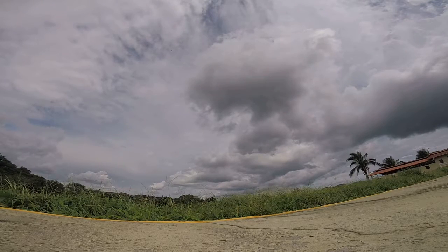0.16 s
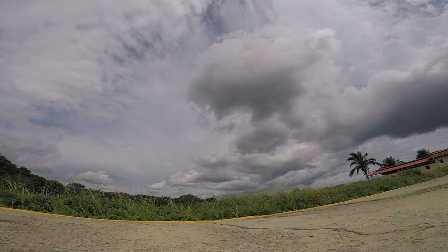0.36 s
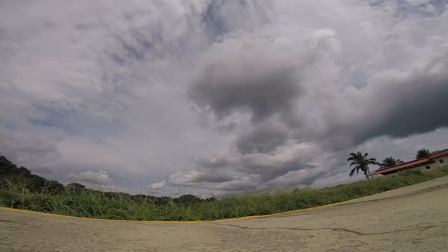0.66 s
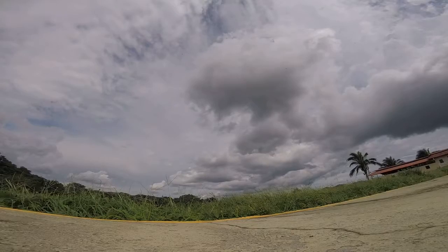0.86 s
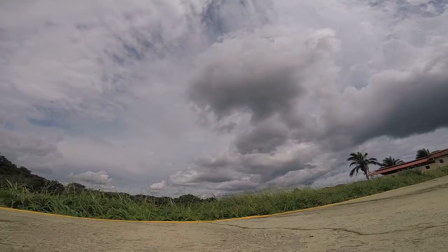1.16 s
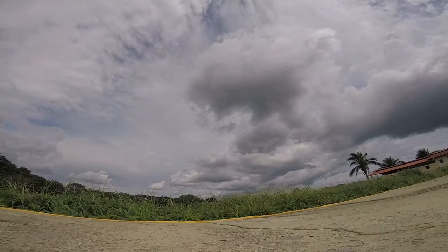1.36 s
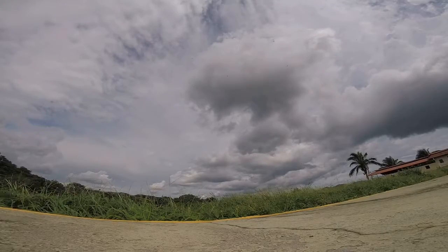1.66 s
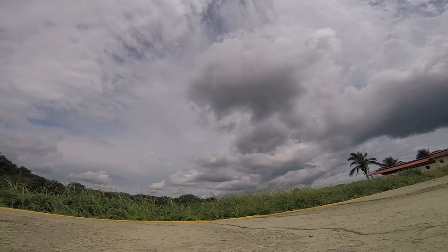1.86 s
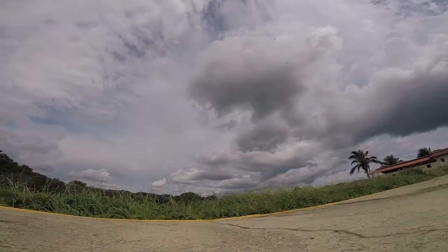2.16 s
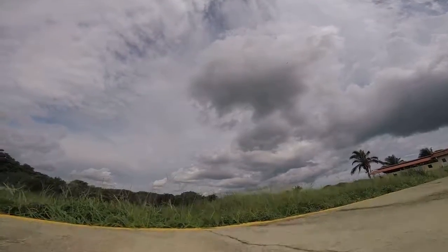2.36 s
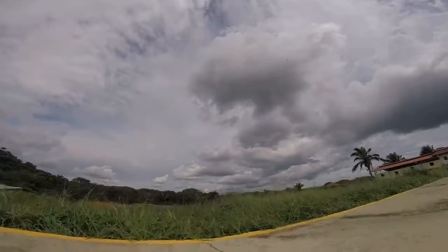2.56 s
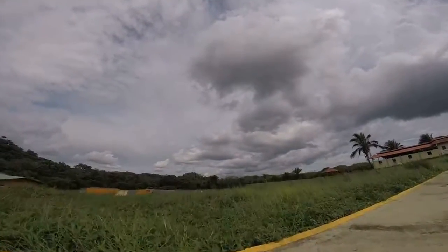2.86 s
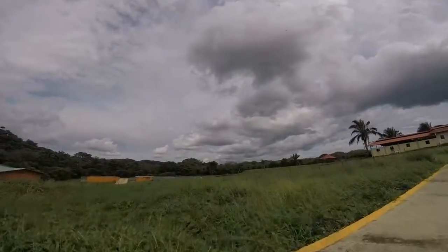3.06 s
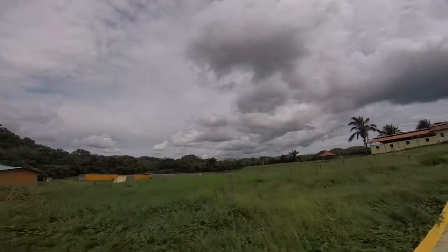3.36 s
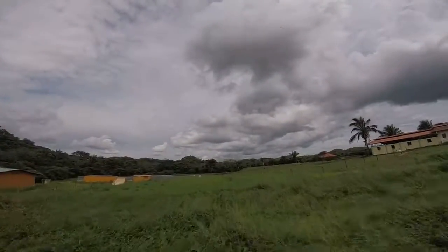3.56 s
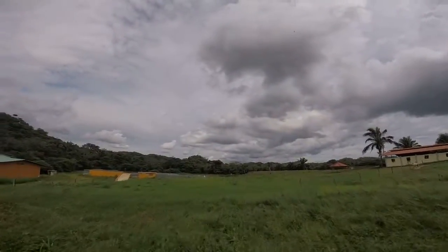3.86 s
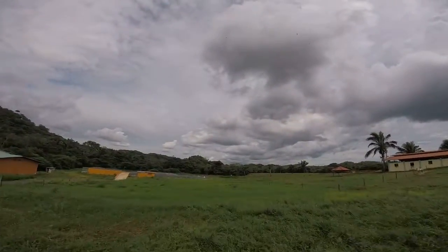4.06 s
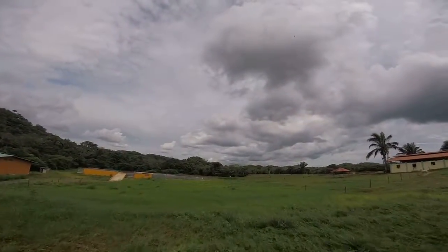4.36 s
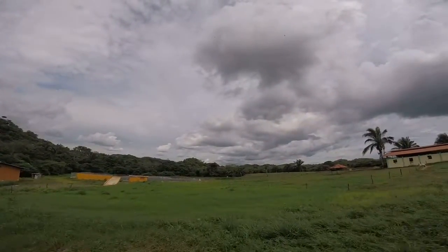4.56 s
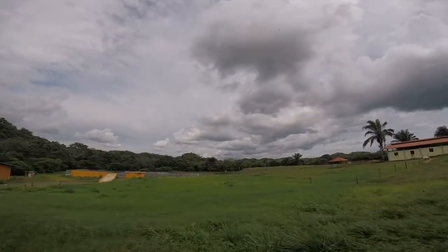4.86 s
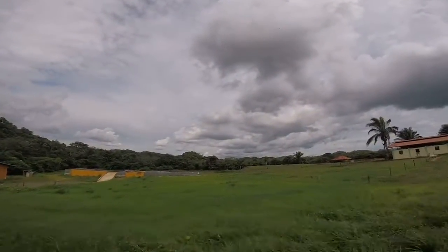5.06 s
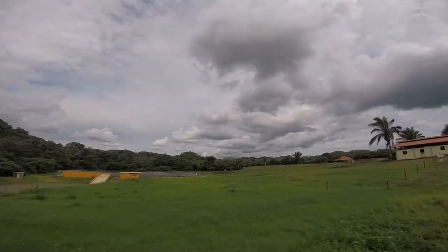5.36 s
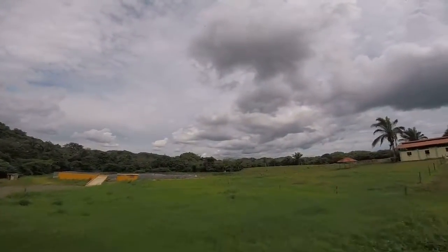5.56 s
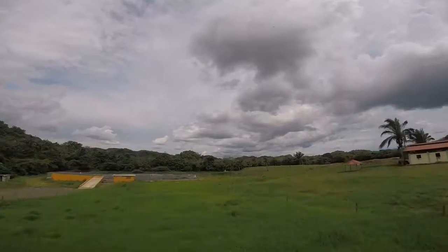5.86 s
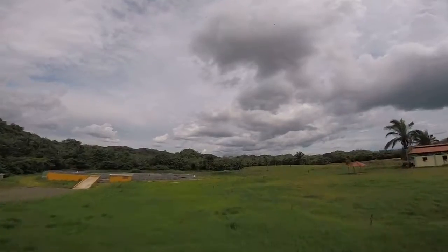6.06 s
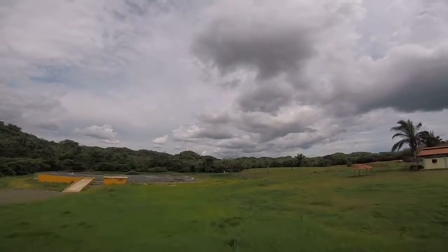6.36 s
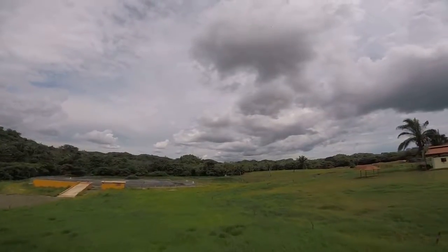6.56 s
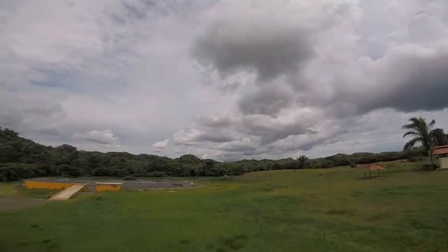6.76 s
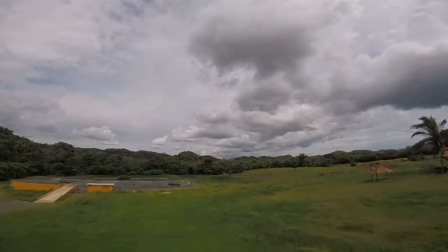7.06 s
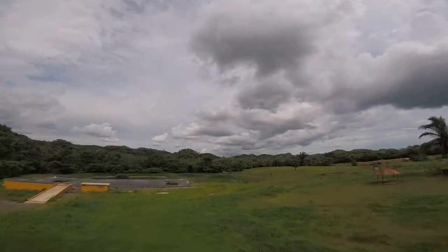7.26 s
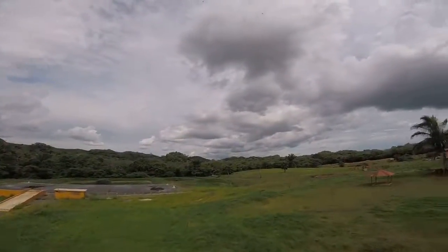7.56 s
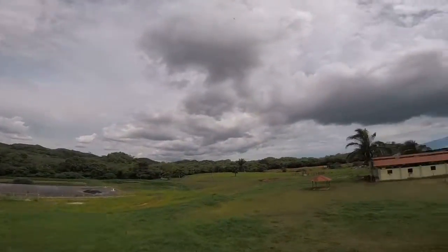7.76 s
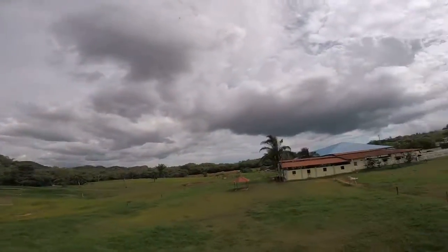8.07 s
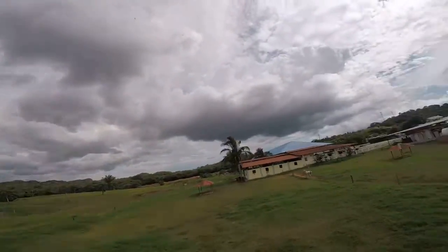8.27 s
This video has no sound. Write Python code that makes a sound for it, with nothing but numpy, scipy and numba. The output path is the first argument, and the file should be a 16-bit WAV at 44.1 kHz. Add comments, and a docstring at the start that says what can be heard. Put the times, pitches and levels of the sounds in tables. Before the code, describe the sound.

Heard from a microphone on the craft itself, a small quadcopter spins up, chatters briefly against concrete and takes off. Its propellers buzz at unequal, wavering pitches that rise steadily, mixed with a thin motor whine, air hiss and low wind rumble. Flying low over grass, it gives four bursts of throttle, the last two highest and each followed by a drop to idle, then revs up unevenly at the end.

```python
"""Racing quadcopter taking off

Heard from its own camera, a small quadcopter idles on concrete, lifts off and flies low over grass
with bursts of throttle. Four three-bladed propellers run at unequal speeds: blades buzz, unbalanced
shafts shake the frame and beat, magnets whine. The blades chop their own wash into hiss, air buffets
the microphone, and the camera's limiter holds the peaks."""
import sys
import numpy as np
from scipy import signal
from scipy.fft import rfft, irfft, next_fast_len
from scipy.io import wavfile
from scipy.ndimage import uniform_filter1d, minimum_filter1d
from numba import njit

SR = 44100
rng = np.random.default_rng(int(sys.argv[2]) if len(sys.argv) > 2 else 0)


def write(x):
    x = np.atleast_2d(x).T
    wavfile.write(sys.argv[1], SR, np.round(np.clip(x, -1, 1) * 32767).astype(np.int16))


N = 371322
TIME = np.arange(N) / SR
# the feet leave the concrete, then the craft climbs clear of its reflected wash (start [s], fade [s])
UNSTICKS, CLIMBS_CLEAR = (0.27, 0.42), (2.39, 0.22)

# transmission through the camera housing (frequency [Hz], gain [dB])
HOUSING = [(250, 8.5), (400, -1), (580, -4), (740, -6.5), (1100, 2.5), (1300, -0.5), (1900, -5),
           (3200, -5.5), (5000, -9), (7400, 3.5), (9000, 1.5), (10000, -27), (13000, -32), (15000, -54.5)]
# spectrum of grit and of the tick (frequency [Hz], level [dB])
GRIT_SPECTRUM = [(500, -31), (3000, -10.5), (6000, 2), (9500, -10), (13000, -14.5), (15000, -35.5)]


def undb(db):
    """Amplitude ratio of a level in decibels."""
    return 10 ** (np.asarray(db) / 20)


def curves(table):
    """Linear interpolation of each column over time."""
    times, *columns = np.transpose(table)
    return [np.interp(TIME, times, column) for column in columns]


def fade(start_s, fade_s):
    """Linear ramp from one to zero."""
    return np.clip(1 - (TIME - start_s) / fade_s, 0, 1)


def walk(rate):
    """Smooth random fluctuation of unit spread, changing about rate times a second."""
    size = max(int(SR / rate), 1)
    held = np.repeat(rng.standard_normal(N // size + 1), size)
    return 1.276 * uniform_filter1d(uniform_filter1d(held, size), size)[:N]


def response(hz, points):
    """Frequency response in dB, interpolated on a logarithmic frequency axis."""
    points_hz, db = np.transpose(points)
    return np.interp(np.log(hz), np.log(points_hz), db)


def shape(x, points):
    """Linear filtering: the spectrum is multiplied by a frequency response."""
    size = next_fast_len(N)
    bin_hz = np.maximum(np.arange(size // 2 + 1) * SR / size, 1)
    return irfft(rfft(x, size) * undb(response(bin_hz, points)), size)[:N]


def colour(x, spectrum):
    """Spectral shaping, normalised to unit RMS."""
    shaped = shape(x, spectrum)
    return shaped / np.std(shaped)


def noise(spectrum):
    """Coloured Gaussian noise of unit RMS."""
    return colour(rng.standard_normal(N), spectrum)


def speed_law(blade_hz, full_db, octave_db, knee_hz):
    """Power law of air noise: it climbs by octave_db an octave and levels off at full_db past the knee."""
    return full_db - octave_db * np.log2(np.hypot(1, knee_hz / blade_hz))


def tick(decay_s):
    """Exponential decay: a short burst of noise is heard as one dry tick."""
    # onset (time [s], level [dB])
    onsets = [(7.473, -36)]
    envelope = sum(undb(db) * np.exp(-np.abs(TIME - s) / decay_s) * (TIME >= s) for s, db in onsets)
    return envelope * colour(rng.uniform(-1, 1, N), GRIT_SPECTRUM) / 2


def ground_contact():
    """Impact and friction: the frame chatters on the concrete and scrapes over grit as it lifts."""
    # contact noise (time [s], chatter level [dB], grit level [dB])
    levels = [(0, -16, -89), (.31, -12, -68), (.35, -16, -31.5), (.41, -9.5, -36), (.49, -15.5, -38),
              (.55, -14, -51), (.9, -58, -61), (1.2, -95, -89)]
    # rattling frame (frequency [Hz], level [dB])
    chatter_spectrum = [(60, -38), (200, -4.5), (270, 3), (350, -4.5), (480, -12), (590, -5.5),
                        (700, -23.5), (900, -26), (1050, -26), (3000, -46), (12000, -63)]
    chatter_db, grit_db = curves(levels)
    chatter = undb(chatter_db) * noise(chatter_spectrum)
    grit = undb(grit_db + 0.87 * walk(rate=220)) * noise(GRIT_SPECTRUM)
    return chatter + grit


def buffeting(blade_hz, turbulence_db, slew):
    """Turbulent pressure: gusts thump the microphone; rough air and throttle jolts make the frame rumble."""
    # wind on the microphone (frequency [Hz], level [dB])
    gust_spectrum = [(15, 11), (30, -7), (60, 5), (110, 3), (160, -3.5), (300, -26.5), (800, -62),
                     (5000, -110)]
    # rumbling frame (frequency [Hz], level [dB])
    rumble_spectrum = [(50, -18.5), (120, 8.5), (250, 0), (370, -1.5), (480, -11.5), (720, -6.5),
                       (900, -17), (1500, -25.5), (3000, -41.5), (12000, -83.5)]
    headwind_db = 1.6 * np.maximum(TIME - CLIMBS_CLEAR[0], 0)  # the craft gathers speed in the open
    reflected_wash_db = 8.5 * fade(*CLIMBS_CLEAR)
    gust_db = speed_law(blade_hz, full_db=-27, octave_db=11, knee_hz=399.5) + 1.01 * turbulence_db
    gust_db += headwind_db + reflected_wash_db + 2 * walk(rate=13)
    rumble_db = speed_law(blade_hz, full_db=-30, octave_db=1.2, knee_hz=295) + 0.62 * turbulence_db
    rumble_db += 1.36 * slew
    return undb(gust_db) * noise(gust_spectrum) + undb(rumble_db) * noise(rumble_spectrum)


def magnets(angle, shaft_hz):
    """Cogging: fourteen magnets tug at the stator slots, sounding multiples of the shaft rate."""
    # magnet and slot tones (multiple of shaft rate, idle level [dB], flight level [dB])
    orders = [(14, -49, -47), (42, -62, -52.5), (89, -83, -49)]
    idle_hz, flight_hz = 57, 113
    load = np.clip((shaft_hz - idle_hz) / (flight_hz - idle_hz), 0, 1)
    turn = (angle % (2 * np.pi)).astype(np.float32)
    return sum(undb(idle + load * (flight - idle)) * np.sin(round(k) * turn) * (k * shaft_hz < SR / 2)
               for k, idle, flight in orders)


def motor_whine(angles, shaft_rates, touch):
    """Structure-borne sound: magnet tones cross the housing; bearings keep the motor bells ringing."""
    # resonances of the motor bells (frequency [Hz], level [dB])
    bell_spectrum = [(1000, -23.5), (1850, -3.5), (2060, 15), (2300, -12.5), (4200, -9), (4550, -1),
                     (4900, -14), (5600, 1.5), (6100, -10), (6750, -7), (7400, -28.5), (8900, -3.5),
                     (9600, -9), (15000, -48.5)]
    lead, *others = [magnets(angle, hz) for angle, hz in zip(angles, shaft_rates)]
    sounding_board = undb(28 * touch ** 2)  # the concrete sounds along while the feet touch
    tones = sounding_board * shape(lead + undb(-2.5) * sum(others), HOUSING)
    bearings = undb(-58.5 + 4.7 * walk(rate=13)) * noise(bell_spectrum)
    return tones + bearings


def imbalance(angle, db, octave_db):
    """Forced vibration: an off-centre mass pulls once a turn; the flexing frame passes it on unevenly."""
    amplitude = np.sqrt(2) * undb(db + 3.0 * walk(rate=25))
    return amplitude * (np.sin(angle) + undb(octave_db) * np.sin(2 * angle))


def frame_shake(angles, shaft_rates):
    """Beating: the unbalanced second and fourth motors drive the frame at unequal rates."""
    # response of the frame (shaft rate [Hz], level [dB])
    frame_response = [(50, -35.5), (100, -22), (120, -14), (145, -20), (170, -9.5), (188, -10.5),
                      (215, -14), (272, -3), (330, -12)]
    shake_db = response(shaft_rates[1], frame_response)
    second = imbalance(angles[1], shake_db - .7, octave_db=-23.5)
    fourth = imbalance(angles[3], shake_db - 5.0, octave_db=-19.0)
    return second + fourth


def chopped_air(angles, spectrum, depth, flicker_db):
    """Amplitude modulation: turbulence swells each time a blade passes an arm."""
    gate = sum(np.exp(depth * np.cos(3 * angle)) for angle in angles)
    return colour(rng.standard_normal(N) * gate * undb(flicker_db * walk(rate=70)), spectrum)


def blade_noise(angles, blade_hz, turbulence_db):
    """Broadband rotor noise: chopped wash, tip hiss and the snarl of rough air drawn through the blades."""
    # spectra of the three noises (frequency [Hz], level [dB])
    wash_spectrum = [(200, 11.5), (500, 6.5), (900, 3), (1500, 3.5), (2200, -4), (3000, -3.5), (4200, -12),
                     (6000, -28), (10000, -47.5), (15000, -70.5)]
    hiss_spectrum = [(2000, -0.5), (4000, -1.5), (5300, -4), (6200, -3), (7100, 0.5), (7800, -3.5),
                     (8400, -9), (8900, -9.5), (9700, -18.5), (10400, -20.5), (11100, -17), (12000, -28.5),
                     (13000, -25.5), (15000, -58.5)]
    snarl_spectrum = [(700, -35), (1500, -8), (2200, 8), (2800, 5.5), (3200, -12), (3700, -22), (6000, -40),
                      (15000, -71)]
    wash_db = speed_law(blade_hz, full_db=-31.5, octave_db=20, knee_hz=399) + 1.5 * turbulence_db
    hiss_db = speed_law(blade_hz, full_db=-29.5, octave_db=26.5, knee_hz=423) + 0.8219 * turbulence_db
    hiss_db += 0.5 * fade(*CLIMBS_CLEAR)
    snarl_db = speed_law(blade_hz, full_db=-37.5, octave_db=20.5, knee_hz=563) + 1.5 * turbulence_db
    wash = undb(wash_db) * chopped_air(angles[:3], wash_spectrum, depth=0.55, flicker_db=1.6)
    hiss = undb(hiss_db) * chopped_air(angles[:2], hiss_spectrum, depth=0.49, flicker_db=1.17)
    snarl = undb(snarl_db) * chopped_air(angles[:1], snarl_spectrum, depth=1.3, flicker_db=3.0)
    return wash + hiss + snarl


def throttle():
    """Feedback control: the lead blade-pass rate, and the depth of the hunting that builds in a burst."""
    # lead propeller in the climb, in level flight and coasting, in the turn (time [s], blade pass [Hz])
    lift_off = [(.32, 124.9), (.37, 232.8), (.43, 259), (.52, 352.5), (.62, 321), (1.09, 325),
                (1.16, 365.2), (1.53, 347.8), (1.62, 376.6), (1.82, 381.8), (1.92, 432), (2.04, 460),
                (2.2, 552.4), (2.36, 535), (2.5, 612), (2.7, 644), (2.82, 616), (2.9, 644), (3.4, 626),
                (3.78, 622)]
    cruise = [(3.89, 568.2), (3.98, 294.7), (4.099, 350.5), (4.451, 450.6), (4.68, 440), (5.38, 479),
              (5.74, 469), (5.9, 132.8), (7.55, 120.1)]
    banked_turn = [(7.61, 240.4), (7.95, 220.2), (8.15, 493), (8.301, 514), (8.392, 602)]
    # throttle bursts (start [s], rise [s], hold [s], fall [s], top blade pass [Hz], overcorrection [ratio])
    bursts = [(4.106, 0.15, 0.14, 0.1, 544.5, 0.01), (4.813, .3, 0.019, .15, 795, 0.011),
              (5.409, .28, .03, .14, 967.5, 0.0604), (6.369, 0.28, .23, .2, 919, 0.11)]
    hz, = curves([*lift_off, *cruise, *banked_turn])
    hunt_depth = np.zeros(N)
    for start, rise, hold, fall, top_hz, overcorrection in bursts:
        opening = np.cos(np.pi / 2 * fade(start, rise))
        closing = np.sin(np.pi / 2 * fade(start + rise + hold, fall)) ** 2
        push = opening * closing
        hz = hz + push * (top_hz - hz)
        hunt_depth += overcorrection * push * (1 - fade(start, rise + hold / 2)) ** 3
    return hz, hunt_depth


def steer(lead_hz):
    """Differential thrust: steering sets the four blade-pass rates apart, and lets go at idle."""
    # motor speeds over the lead's (time [s], second [ratio], third [ratio], fourth [ratio])
    steering = [(.6, 0.89, 1.09, 0.6), (1.85, 0.99, 0.93, 0.62), (2.25, 0.95, 0.88, 1.084),
                (2.7, .825, 0.98, 0.95), (3.15, 0.87, 1.05, 0.98), (3.399, 0.93, 0.9, 1.0),
                (3.86, 0.9, 0.82, 1.014), (4.02, 1.51, 1.11, 1.36), (4.22, 1.02, 1.18, 1.19),
                (4.421, 1.103, .94, 1.19), (4.652, 1.177, 1.03, 1.27), (4.95, 1.054, .89, 0.97),
                (5.7, 1.04, .93, .98), (6.5, 1.02, 0.86, 1.16), (6.86, .92, .8, 1.0),
                (6.98, 1.25, .85, 1.1), (7.65, 1.17, 1.18, 1.4), (7.8, 1.54, 0.87, 1.8),
                (7.9, 1.95, 1.2, 1.69), (8.181, 0.96, 0.74, 1.204), (8.42, 1.13, 0.88, 1.19)]
    # the same at idle (second [ratio], third [ratio], fourth [ratio])
    idle_ratios = [1.15, 1.2, 1.14]
    idle_hz, steered_hz = 134.7, 299.6
    grip = np.clip((lead_hz - idle_hz) / (steered_hz - idle_hz), 0, 1)
    ratios = [idle + grip * (steered - idle) for idle, steered in zip(idle_ratios, curves(steering))]
    return [lead_hz] + [lead_hz * ratio for ratio in ratios]


def spin(shaft_hz, flutter):
    """Frequency modulation: shaft angle of a constantly corrected motor, fluttering on a slow wander."""
    drift = flutter * walk(rate=70) + .006 * walk(rate=9)
    return 2 * np.pi * (np.cumsum(shaft_hz * (1 + drift)) / SR + rng.random())


def propeller(angle, tone_db, overtone_db, tilt_db, waver_db):
    """Harmonic series of three pulses a turn: load sharpens them, uneven inflow makes them waver."""
    # overtones (multiple of blade-pass rate, level [dB])
    orders = [(2, -2.5), (3, -6.5), (4, -10.5), (5, -12.5), (6, -16), (7, -19.5), (8, -33.5), (9, -37),
              (10, -46.5), (11, -27), (12, -29.5), (14, -41.5)]
    phase = (3 * angle % (2 * np.pi)).astype(np.float32)
    exponent = (tilt_db / (20 * np.log10(2))).astype(np.float32)
    overtones = sum(undb(db) * (k / 2) ** exponent * np.sin(round(k) * phase + rng.uniform(0, 2 * np.pi))
                    for k, db in orders)
    buzz = shape(undb(overtone_db + waver_db * walk(rate=110)) * overtones, HOUSING)
    return np.sqrt(2) * (undb(tone_db) * np.sin(phase) + buzz)


def blade_buzz(angles, blade_rates, touch, turbulence_db, slack_db):
    """Tonal rotor noise: the three nearest propellers buzz, louder and brighter with speed."""
    # fundamental in calm air (blade pass [Hz], level [dB])
    calm_tone = [(120, -31.5), (230, -21), (320, -20), (360, -13.5), (390, -15.5), (445, -14.5),
                 (530, -16.5), (625, -19), (790, -20), (960, -17.5)]
    # overtones at full speed (time [s], level [dB])
    overtone_levels = [(0, -12.5), (.5, -29.5), (1.4, -30), (1.8, -38), (2.2, -34.5), (2.6, -32.5),
                       (3.35, -24), (3.9, -31.5), (4.35, -33.5), (4.7, -45), (4.95, -31), (5.35, -38),
                       (5.7, -26), (5.9, -39), (6.9, -34.5), (7.65, -35), (8.0, -22), (8.42, -24.5)]
    # second and third propellers against the lead as the craft leans (time [s], level [dB])
    lean_levels = [(0, -24), (.7, -12.5), (1.25, -10.5), (2.0, -7.5), (2.7, -13), (3.15, -9.5), (3.55, -4),
                   (4.7, -4), (5.7, -6.5), (7.8, -5), (8.42, -6)]
    # each propeller, lead first (tone offset [dB], overtone offset [dB], waver [dB])
    voices = [(-1, 2, 3), (-5, -9, -1), (-1, -1.5, 4.5)]
    slow_hz, fast_hz, brighten_from_hz = 360, 560, 270
    full_db, = curves(overtone_levels)
    others_db, = curves(lean_levels)
    buzz = 0
    for angle, hz, lean_db, voice in zip(angles, blade_rates, (0, others_db, others_db), voices):
        tone_offset_db, overtone_offset_db, waver_db = voice
        slow = np.clip((fast_hz - hz) / (fast_hz - slow_hz), 0, 1)
        drumming_db = 0.62 * turbulence_db * slow  # slow blades drum in rough air
        cushion_db = 8.5 * fade(*CLIMBS_CLEAR) * (1 - slow)  # fast ones lose tone on the ground cushion
        tone_db = response(hz, calm_tone) + tone_offset_db + drumming_db - cushion_db + 5.5 * touch
        overtone_db = speed_law(hz, full_db + overtone_offset_db, octave_db=4.5, knee_hz=304)
        tilt_db = 1.5 * np.log2(np.maximum(hz / brighten_from_hz, 1))  # per octave of overtones
        buzz += undb(lean_db - slack_db) * propeller(angle, tone_db, overtone_db, tilt_db, waver_db)
    return buzz


def scene():
    """Superposition: four motors on one frame, the air they throw and the ground they leave."""
    # roughness over calm air, high over the concrete, in hard bursts and in the turn (time [s], level [dB])
    turbulence = [(0, 14), (.3, 15), (.36, 21.5), (.55, 13.5), (1.05, 17), (1.3, 10), (1.85, 12),
                  (2.17, 12.5), (2.45, 4.5), (3.3, 5), (4.0, 4), (5.45, 2.5), (5.72, 2.5), (6.1, 1.5),
                  (6.48, 10), (6.62, 4.5), (7.5, 0.5), (7.98, 16), (8.42, 6.5)]
    hunt_hz, hunt_peak_s, slack_lag_s = 23.7, 6.764, 0.056
    lead_hz, hunt_depth = throttle()
    hunt = 1 + hunt_depth * np.cos(2 * np.pi * hunt_hz * (TIME - hunt_peak_s))
    blade_rates = steer(lead_hz)
    # three blades to a shaft; the fourth motor hunts against the others
    shaft_rates = [hz * swing / 3 for hz, swing in zip(blade_rates, (hunt, hunt, hunt, 1 / hunt))]
    acceleration = uniform_filter1d(np.gradient(np.log(lead_hz)) * SR, size=2048)  # relative [1/s]
    slew = np.minimum(np.abs(acceleration), 6)
    # a braking motor goes slack and its tones sink a moment later
    slack_db = np.clip(-1.41 * np.interp(TIME - slack_lag_s, TIME, acceleration), 0, 5.6)
    angles = [spin(hz, flutter=.0022 + .004 * slew + .08 * hunt_depth) for hz in shaft_rates]
    mean_hz, touch = np.mean(blade_rates, axis=0), fade(*UNSTICKS)
    turbulence_db, = curves(turbulence)
    surge = hunt ** 2.55  # blade sound swells steeply with each swing of tip speed
    buzz = blade_buzz(angles, blade_rates, touch, turbulence_db, slack_db)
    rotors = surge * (buzz + blade_noise(angles, mean_hz, turbulence_db))
    shake = undb(-slack_db) * frame_shake(angles, shaft_rates)
    whine = motor_whine(angles, shaft_rates, touch)
    wind = buffeting(mean_hz, turbulence_db, slew)
    return (rotors + shake + whine + wind + ground_contact() + tick(decay_s=0.0046))[None]


@njit
def peak_follower(x, release):
    """Envelope detection: instant attack, exponential release."""
    envelope, peak = np.empty(len(x)), 0.
    for i in range(len(x)):
        peak = max(abs(x[i]), peak * release)
        envelope[i] = peak
    return envelope


def limiter(x, ceiling, release_s, window):
    """Look-ahead limiting: the gain falls just before each peak."""
    peaks = peak_follower(x, np.exp(-1 / (release_s * SR)))
    gain = ceiling / np.maximum(peaks, ceiling)
    return x * uniform_filter1d(minimum_filter1d(gain, window), window)


def record(dry):
    """Peak and band limiting: the camera holds the peaks and cuts the highest treble."""
    cutoff_hz = 14500
    limited = limiter(dry[0] * undb(0.07), ceiling=0.86, release_s=0.013, window=128)
    lowpass = signal.ellip(8, .2, 70, cutoff_hz, fs=SR, output="sos")
    return signal.sosfilt(lowpass, limited)[None]


dry = scene()
out = record(dry)
write(out)
```